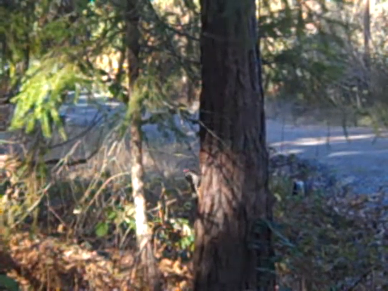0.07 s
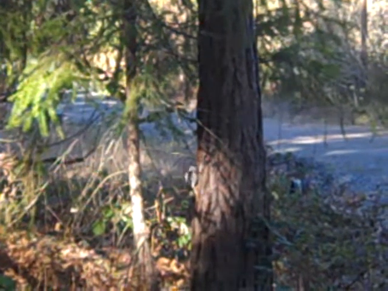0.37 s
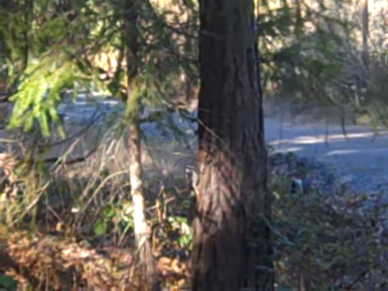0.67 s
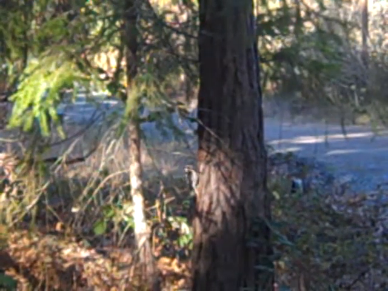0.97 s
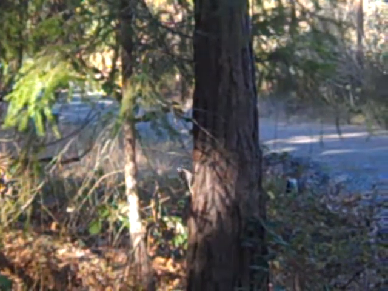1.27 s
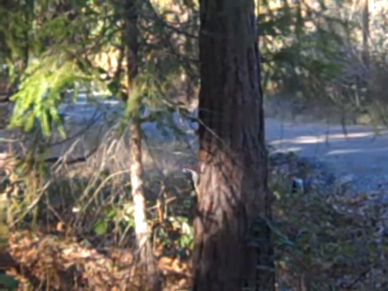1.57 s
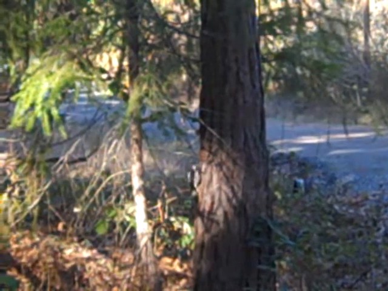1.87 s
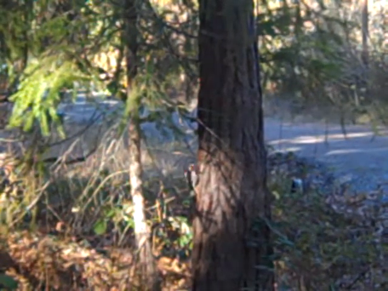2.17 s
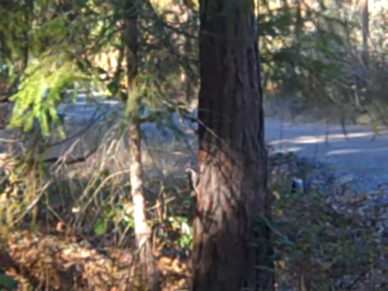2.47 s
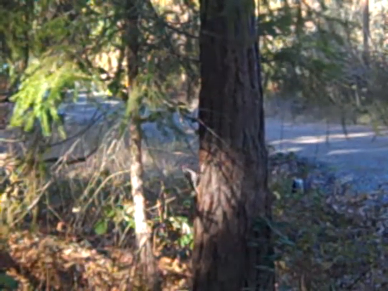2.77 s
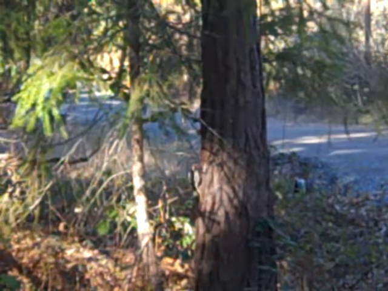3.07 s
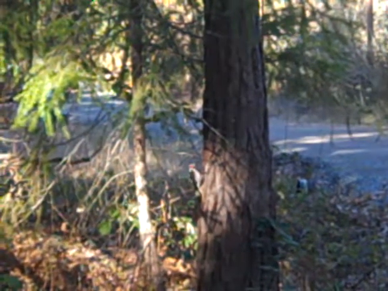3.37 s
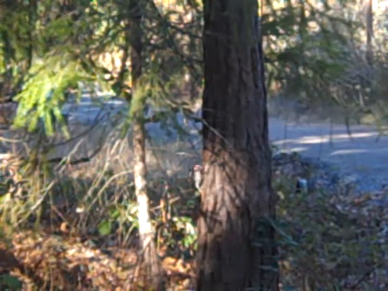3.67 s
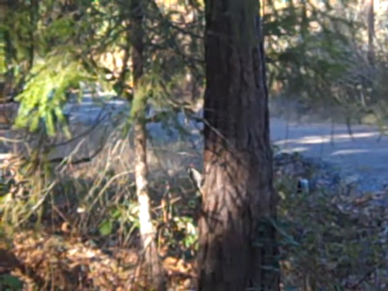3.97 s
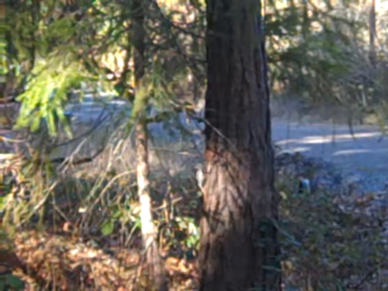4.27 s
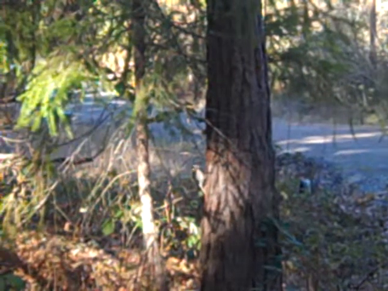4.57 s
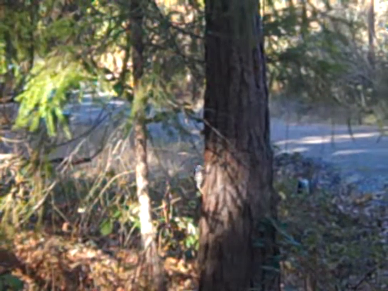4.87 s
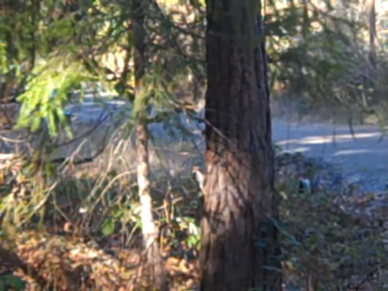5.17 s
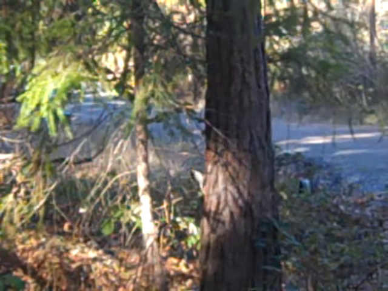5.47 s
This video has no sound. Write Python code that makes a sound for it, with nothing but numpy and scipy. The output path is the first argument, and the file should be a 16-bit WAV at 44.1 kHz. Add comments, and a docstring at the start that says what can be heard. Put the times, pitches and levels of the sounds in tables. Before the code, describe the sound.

A woodpecker chisels at a tree trunk ahead, making short, dry, woody knocks of varying strength with faint splintering of bark. About seven pecks fall between 0.4 and 2 seconds, a lone one at 3.1, and seven more from 3.8 to 5.5. At 0.5 seconds a very sharp click right at the microphone briefly overloads it, the loudest sound here. Soft bumps touch the microphone at about 0.4, 1.2 and 2.6 seconds. Off to the right, a small bird gives one faint, thin, high call at 0.75 seconds. From 1.8 to 2.6 seconds a jay, also on the right, scolds with six quick raspy notes. At 3.2 seconds a quieter bird slurs upward into a rapid high trill that fades by about 4.1. The trees lend everything a light echo, and the soft steady roar of a distant road lies underneath throughout.

```python
"""A woodpecker chisels at a fir trunk ahead of a stereo microphone: the bill touches, drives home with
a woody knock, and bark splinters. Off to the right a small bird gives one thin call, a jay scolds six
times and another bird trills. The trees echo them all, over the steady roar of a distant road.
Early on, something clicks sharply right at the microphone and overloads it; its body takes soft bumps."""
import sys
import numpy as np
from scipy import signal
from scipy.fft import rfft, irfft
from scipy.io import wavfile
from scipy.ndimage import uniform_filter1d

SR = 44100
rng = np.random.default_rng(int(sys.argv[2]) if len(sys.argv) > 2 else 0)


def store_wav(level_fs):
    """Save 16-bit WAV to argv[1]."""
    pcm = np.round(np.clip(np.atleast_2d(level_fs), -1, 1) * 32767)
    wavfile.write(sys.argv[1], SR, pcm.T.astype(np.int16))


N = 247401
TIME = np.arange(N) / SR
HZ = np.maximum(np.fft.rfftfreq(N, 1 / SR), 1)
SIDES = np.array([[1], [-1]])  # left, right


def undb(db):
    """Decibels to gain."""
    return 10 ** (np.asarray(db) / 20)


def unit(x):
    """Scale to rms 1."""
    return x / np.sqrt(np.mean(x ** 2))


def fade(t, t60):
    """Exponential decay, 60 dB down after t60."""
    return np.exp(-np.log(1000) * t / t60)


def swell(t, attack, release):
    """Attack, hold and release over the times t."""
    return np.clip(np.minimum(t / attack, (t[-1] - t) / release), 0, 1)


def add(out, s, x):
    """Mix a sound in at s seconds."""
    i = int(s * SR)
    out[..., i:i + x.shape[-1]] += x[..., :N - i]


def spectrum(points):
    """Join (Hz, value) points on a log-frequency axis."""
    hz, value = np.transpose(points)
    return np.interp(np.log(HZ), np.log(hz), value)


def band(x, lo_hz, hi_hz, order=2):
    """Causal band-pass."""
    return signal.sosfilt(signal.butter(order, [lo_hz, hi_hz], "band", fs=SR, output="sos"), x)


def wander(rate, size):
    """A random curve that turns about rate times a second, with a spread near 1."""
    samples = np.arange(size)
    return np.interp(samples * rate / SR, samples, rng.standard_normal(size)) * np.sqrt(3 / 2)


def tone(hz):
    """A sine of rms 1 that follows a pitch curve."""
    return np.sqrt(2) * np.sin(2 * np.pi * np.cumsum(hz) / SR)


def place(x, pan_db, lag_ms):
    """A source to one side is pan_db louder at the microphone's left port and arrives lag_ms later."""
    lag = np.exp(-1j * np.pi * HZ * SIDES * lag_ms / 1000)
    return irfft(rfft(x) * undb(pan_db * SIDES / 2) * lag, N)


def woods(x, near_db, near_t60, far_db, far_t60):
    """Nearby ground and twigs scatter at once; distant trunks return a long, duller tail."""
    t = TIME[:SR]
    echoes = rng.standard_normal((2, 2, SR)) * undb(2.9 * rng.standard_normal((2, 1, SR)))
    near = echoes[0] * fade(t, near_t60) * (t > .002)
    far = band(echoes[1], 250, 5260) * fade(t, far_t60) * undb(2.4 * wander(58, SR)) * (t > .012)
    mid, side = (undb(near_db) * unit(near) + undb(far_db) * unit(far)) / np.sqrt(SR)
    side = band(side, 1800, 16000, order=1)  # long waves reach both ports alike
    return x + signal.fftconvolve(x[None], (mid + side * SIDES) / np.sqrt(2), axes=1)[:, :N]


# Road and woodland air, all around. Each row: frequency in Hz, relative spectral density in dB.
AIR_SPECTRUM = [(20, -15), (40, -15), (60, -8.5), (125, -5.5), (231, -5.5), (282, -5.5), (351, -2),
                (500, -4), (850, -2), (1300, -10), (2540, -23), (5700, -28.5), (7500, -27.5), (10000, -32),
                (14000, -34)]
# Their stereo width. Each row: frequency in Hz, side minus mid in dB.
AIR_WIDTH = [(40, -20), (120, -6.5), (530, -12.5), (950, -11.5), (1600, -3), (2800, 1.5), (8000, 0)]


def distant_road(settled_db=-51.5, rise_db=1.53, rise_s=1.6):
    """Far-off tyre roar wavers in each octave under a smooth hiss; both rise slightly, then settle."""
    mid, side = rfft(rng.standard_normal((2, N)))
    air = (mid + side * SIDES * undb(spectrum(AIR_WIDTH))) * undb(spectrum(AIR_SPECTRUM))
    roar = air / (1 + (HZ / 2000) ** 4)
    out = irfft(air - roar, N)  # the hiss
    octave = np.clip(np.log2(HZ / 64), 0, 5)
    for k in range(6):
        roar_band = irfft(roar * np.maximum(1 - abs(octave - k), 0), N)
        out += roar_band * undb(1.1 * wander(9, N))
    level_db = settled_db - rise_db * np.exp(-TIME / rise_s)
    return unit(out) * undb(level_db + .5 * SIDES)


def splinter(lo_hz, hi_hz, t60):
    """A burst of tiny fractures in the bark, with the energy of 16 ms at rms 1."""
    t = TIME[:int(SR / 20)]
    grains = rng.standard_normal(len(t)) * undb(2.38 * rng.standard_normal(len(t)))
    burst = band(grains * fade(t, t60), lo_hz, hi_hz, order=3)
    return burst / np.sqrt(np.sum(burst ** 2) / (.016 * SR))


# Pecks on the fir ahead. Each row: time of the blow in seconds, its strength in dB, the first touch
# against the blow in dB, then relative levels of the crack and of the splinters in dB.
PECKS_ON_FIR = [(0.3895, -8.5, -4.5, -51.5, -47.5), (0.5577, -13, -8.5, -53, -45),
                (0.8863, -19, -10, -45.5, -44), (1.185, -18, -10, -54, -55),
                (1.5090, -19.5, -8.5, -48, -48), (1.8096, -14.5, -7, -53, -46),
                (2.007, -9, -6.5, -42.5, -50), (3.0658, -10.5, -8.5, -48.5, -50.5),
                (3.8190, -16.5, -7.5, -44, -49), (4.0149, -8, -4.5, -44.5, -50),
                (4.474, -17.5, -18, -42.5, -45.5), (4.654, -14, -5, -41.5, -53.5),
                (5.0031, -10, -4.5, -42, -48), (5.216, -12.5, -3, -48, -46.5),
                (5.5175, -12.5, -3.5, -47.5, -45)]
# The trunk's modes. Each row: frequency in Hz, relative level in dB, time to fall 60 dB in seconds.
TRUNK_MODES = [(400.7, -18, 0.034), (492, -45, .035), (623, -4.5, 0.0086), (956, -13.5, 0.024),
               (1105, -8.5, 0.013), (1340, -21.5, 0.028)]
# Loose flakes of bark. Each row: start in seconds, level in dB, dull part against bright part in dB.
BARK_FLAKES = [(.363, -63, -9), (1.141, -63, -17), (1.598, -65, -12.5), (4.163, -66.5, -13.5),
               (4.395, -59, 9), (4.442, -66, -3), (5.193, -62, -3), (5.271, -65, -9)]


def woodpecker(lead_s=.00115, quickening_db=24, hardness_hz=470, softening_db=6.5):
    """Each peck pushes the trunk twice, touch then blow, while the bark cracks and sheds flakes."""
    knocks, bark, t = np.zeros(N), np.zeros(N), TIME[:4096]
    hz = np.fft.rfftfreq(len(t), 1 / SR)
    trunk = rfft(sum(undb(db) * np.sin(2 * np.pi * f * t) * fade(t, t60) for f, db, t60 in TRUNK_MODES))
    for s, blow_db, touch_db, crack_db, splinter_db in PECKS_ON_FIR:
        # a stronger blow follows the touch sooner and sinks deeper: soft bark lengthens the push
        touch_s = s - lead_s * 2 ** (-blow_db / quickening_db)
        corner_hz = hardness_hz * 2 ** (-blow_db / softening_db)
        knock = -undb(blow_db) * irfft(trunk / (1 + 1j * hz / corner_hz) ** 2)
        add(knocks, touch_s, undb(touch_db) * knock)
        add(knocks, s, knock)
        tip_snap = undb(splinter_db - 18.5) * splinter(1970, 12500, t60=.0042)
        crack = undb(crack_db - 2) * splinter(940, 3100, t60=.025)
        splinters = undb(splinter_db - .5) * splinter(4190, 8160, t60=.033)
        add(bark, touch_s, tip_snap + crack + splinters)
    for s, db, dull_db in BARK_FLAKES:
        bright = splinter(6200, 9000, t60=.018)
        dull = undb(dull_db) * splinter(1600, 5900, t60=.0064)
        add(bark, s, undb(db) * (bright + dull))
    # the trunk radiates little below its lowest mode
    knocks = signal.sosfilt(signal.ellip(4, .3, 25, 386, "high", fs=SR, output="sos"), knocks)
    knocks = woods(knocks, near_db=-6, near_t60=.03, far_db=-21, far_t60=.95)
    bark = woods(bark, near_db=-12, near_t60=.14, far_db=-22.5, far_t60=.23)
    return knocks + place(bark, pan_db=-3, lag_ms=.027)


# Soft bumps on the microphone's body. Each row: start in seconds, peak level in dB.
MIC_BUMPS = [(0.429, -45), (1.248, -41.5), (2.625, -43.5)]
# The modes of that body. Each row: frequency in Hz, level in dB, time to fall 60 dB in seconds,
# left minus right in dB.
MIC_MODES = [(219, -7, 0.015, 0), (432, -13.5, 0.013, -12), (988, -11.5, 0.015, 5.5),
             (1360, -27.5, 0.016, 16), (1910, -21, 0.019, 2), (2630, -5, 0.005, 4.5),
             (3900, -9, 0.0044, -4), (4520, -15, 0.0095, 0), (5790, -16, 0.008, -15), (6430, -7, 0.0041, 6),
             (7345, 3, 0.00224, 16), (7100, -27, .026, 6.5), (9770, -35, 0.005, 40),
             (13400, -29.5, 0.0047, -5)]


def microphone_handling(click_s=.4949):
    """A hard click rings every mode of the microphone's body; soft bumps bring out the low ones."""
    out, t = np.zeros((2, N)), TIME[:4096]
    # neighbouring modes swing in opposite directions
    ring = sum((-1) ** k * undb(db + pan_db * SIDES / 2) * np.sin(2 * np.pi * hz * t) * fade(t, t60)
               for k, (hz, db, t60, pan_db) in enumerate(MIC_MODES))
    ring = band(ring, 150.1, 15200, order=3)
    add(out, click_s, ring)
    thud = band(ring.mean(axis=0), 110, 260, order=1)
    for s, db in MIC_BUMPS:
        add(out, s, undb(db) * thud / np.abs(thud).max())
    direct = out.mean(axis=0)
    echoes = woods(direct, near_db=-16.5, near_t60=.05, far_db=-41.5, far_t60=.62) - direct
    return out + echoes


def whistle(length_s, pitches_hz, rough, attack, release):
    """A note bends through three pitches; attack and release are shares of its length."""
    progress = np.linspace(0, 1, int(length_s * SR))
    arch_hz = np.polyval(np.polyfit([0, .5, 1], pitches_hz, 2), progress)
    jitter = 1 + rough * wander(820, len(progress))
    return tone(arch_hz * jitter) * swell(progress, attack, release)


# Small birds off to the right: the slur that opens the trill, and the lone thin call.
# Each row: start and length in seconds, first, middle and last pitch in Hz, level in dB.
SINGLE_NOTES = [(3.172, 0.049, 3020, 3450, 3480, -49.5), (.752, 0.046, 7400, 8200, 6300, -58.5)]
# One trill syllable, two voices and a soft tail.
# Each row: delay and length in seconds, first, middle and last pitch in Hz, relative level in dB.
TRILL_SYLLABLE = [(.003, 0.013, 3460, 5470, 5700, -2.5), (.007, .014, 3540, 4910, 5200, -2.5),
                  (0.02, .032, 4050, 3750, 3600, -11.5)]


def songbirds(trill_s=3.2265, syllables=16, gap_s=.0518, slowing_s=.0002, trill_db=-51, fade_db=7.5):
    """One bird gives a thin call; later another slurs into a two-voiced trill that slows and fades."""
    out = np.zeros(N)
    for s, length_s, *pitches_hz, db in SINGLE_NOTES:
        add(out, s, undb(db) * whistle(length_s, pitches_hz, rough=.02, attack=.55, release=.25))
    for k in range(syllables):
        s = trill_s + gap_s * k + slowing_s * k ** 2
        level_db = trill_db - fade_db * (k / syllables) ** 2
        for delay_s, length_s, *pitches_hz, db in TRILL_SYLLABLE:
            glide = whistle(length_s, pitches_hz, rough=.035, attack=.18, release=.17)
            add(out, s + delay_s, undb(level_db + db) * glide)
    out = woods(out, near_db=-4, near_t60=.031, far_db=-9, far_t60=.58)
    return place(out, pan_db=-5.5, lag_ms=-.072)


def ground_bounce(x, echo_db, delay_ms):
    """A bounce off the ground reaches the microphone just after the direct sound and combs it nasal."""
    return irfft(rfft(x) * (1 + undb(echo_db) * np.exp(-2j * np.pi * HZ * delay_ms / 1000)), N)


# The jay's scolding, among the trees to the right. Each row: start in seconds, relative level in dB.
JAY_NOTES = [(1.783, -31.5), (1.935, -33), (2.074, -34.5), (2.223, -34.5), (2.391, -34.5), (2.539, -35.5)]
# The three steps of every note. Each row: start as a share of the note, lower and upper voice in Hz.
JAY_PITCH_STEPS = [(0, 2188, 6105), (.48, 2891, 5602), (0.798, 3480, 4750)]


def jay(note_s=.055, slide_s=.0048):
    """The two sides of the syrinx step towards each other in pitch, both rough, with rasp and growl."""
    out, n = np.zeros(N), int(note_s * SR)
    progress = np.arange(n) / n
    share, lower_hz, upper_hz = np.transpose(JAY_PITCH_STEPS)
    step = np.searchsorted(share[1:], progress)
    low_hz = uniform_filter1d(lower_hz[step], int(slide_s * SR))
    high_hz = uniform_filter1d(upper_hz[step], int(slide_s * SR))
    loudness = swell(TIME[:n], attack=.017, release=.0091)
    effort = np.sin(np.pi * progress)  # the noise is strongest mid-note
    for s, db in JAY_NOTES:
        low = tone(low_hz * (1 + .028 * wander(1773, n))) * undb(2 * wander(940, n))
        high = tone(high_hz * (1 + .069 * wander(2600, n))) * undb(2 * wander(854, n))
        rasp = unit(band(rng.standard_normal(n), 3900, 8900, order=5)) * undb(2 * wander(664, n))
        growl = unit(band(rng.standard_normal(n), 1490, 2650, order=3))
        voices = loudness * (undb(-7.5) * low + undb(-11.5) * high)
        noise = effort * (undb(-15.5) * rasp + undb(-10) * growl)
        add(out, s, undb(db) * (voices + noise))
    out = ground_bounce(band(out, 1650, 9300, order=3), echo_db=-8, delay_ms=1.38)
    out = woods(out, near_db=-2, near_t60=.081, far_db=-8.5, far_t60=.91)
    return place(out, pan_db=-7, lag_ms=.13)


# The balance of the microphone's two ports. Each row: frequency in Hz, left minus right in dB.
PORT_BALANCE = [(600, -1), (1200, 0.5), (2400, 9), (3500, -0.5), (4400, -2), (5600, -3), (6500, -7),
                (7600, 13), (8700, 11.5), (10500, 11.5), (14000, 13)]


def microphone_ports(x):
    """The two ports colour sound from ahead differently."""
    return irfft(rfft(x) * undb(spectrum(PORT_BALANCE) * SIDES / 2), N)


def scene():
    """Birds ahead of the microphone, handling noise right on it, the distant road all around."""
    birds = woodpecker() + jay() + songbirds()
    return microphone_ports(birds) + microphone_handling() + distant_road()


def record(dry):
    """The input clips at full scale; rumble below 45 Hz and the top above 14.3 kHz are cut."""
    clipped = np.clip(dry, -1, 1)
    low_cut = signal.sosfilt(signal.butter(2, 45, "high", fs=SR, output="sos"), clipped)
    return signal.sosfilt(signal.ellip(8, .2, 70, 14300, fs=SR, output="sos"), low_cut)


dry = scene()
out = record(dry)
store_wav(out)
```